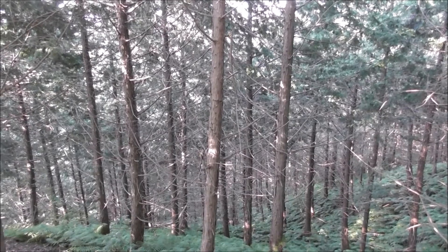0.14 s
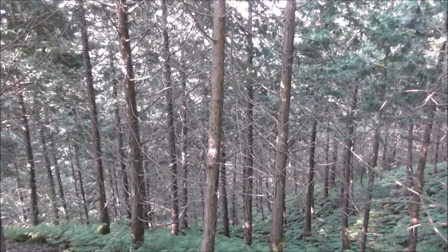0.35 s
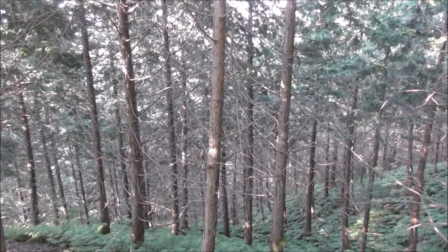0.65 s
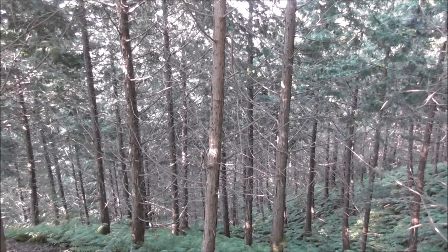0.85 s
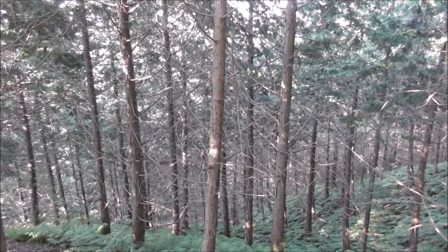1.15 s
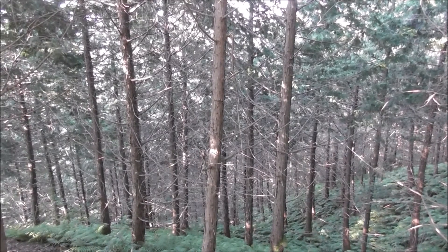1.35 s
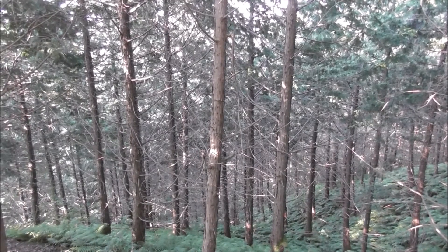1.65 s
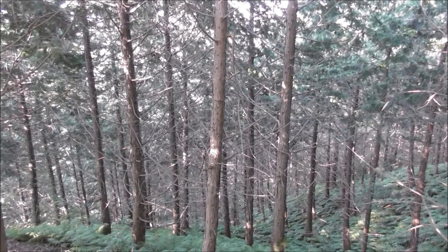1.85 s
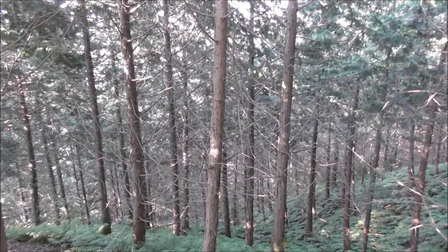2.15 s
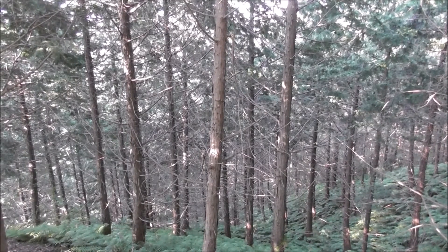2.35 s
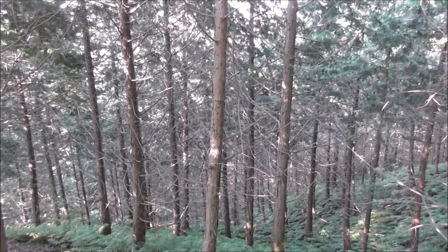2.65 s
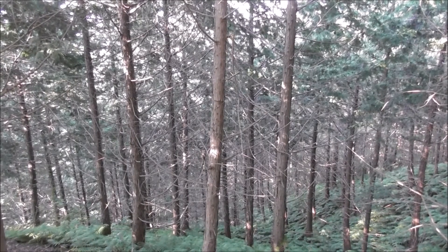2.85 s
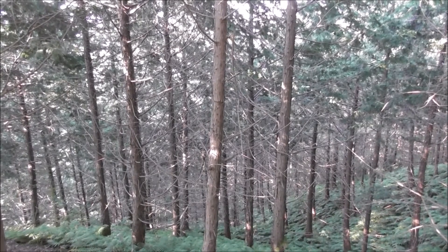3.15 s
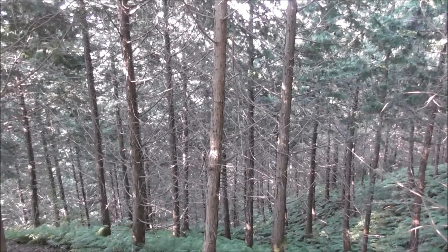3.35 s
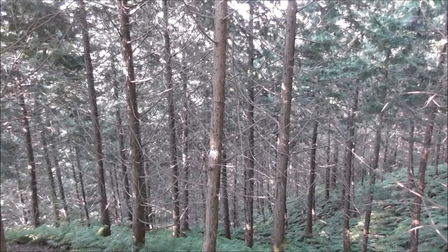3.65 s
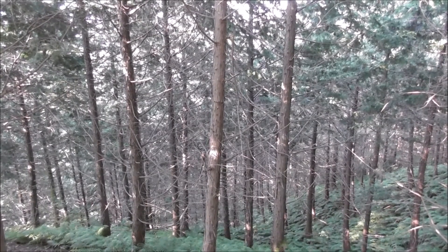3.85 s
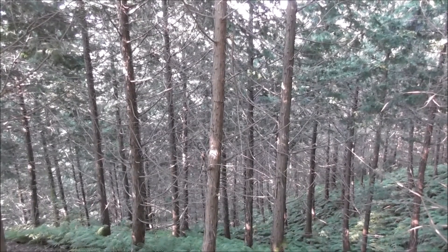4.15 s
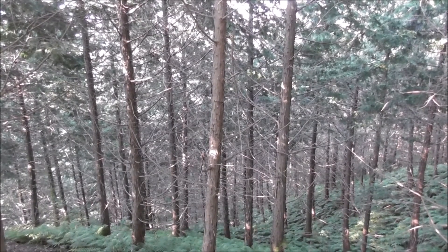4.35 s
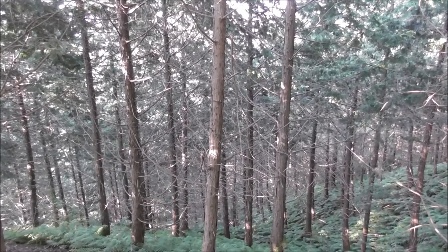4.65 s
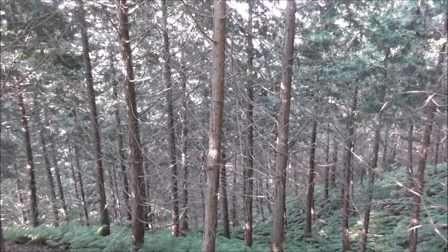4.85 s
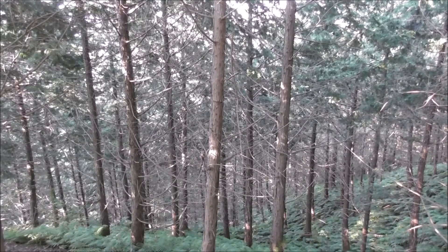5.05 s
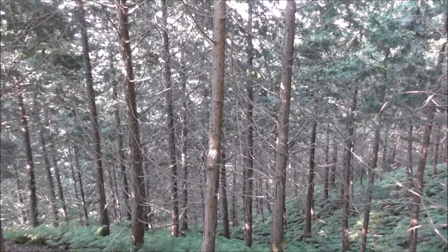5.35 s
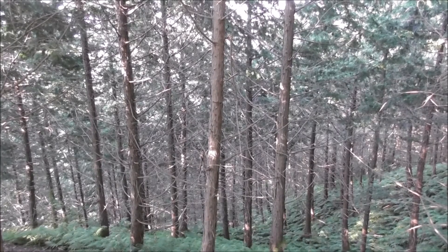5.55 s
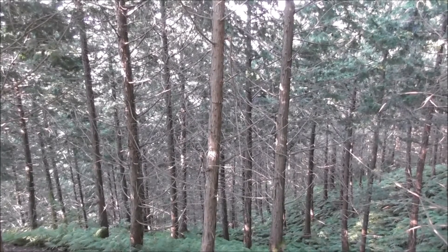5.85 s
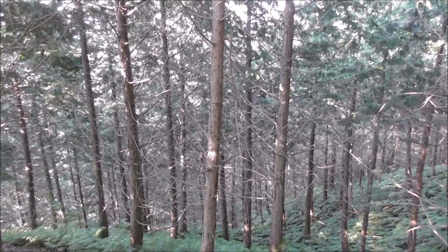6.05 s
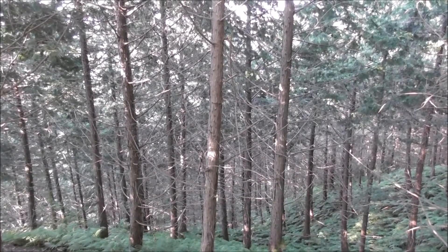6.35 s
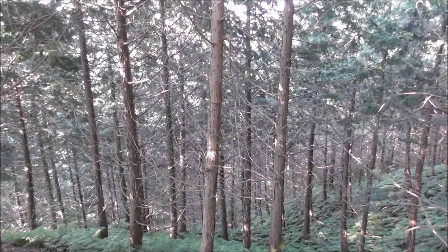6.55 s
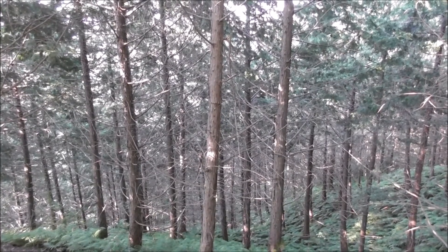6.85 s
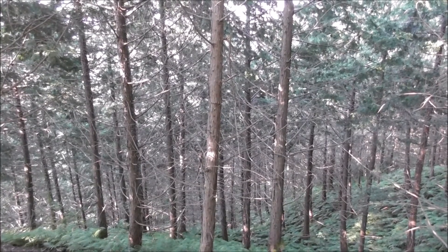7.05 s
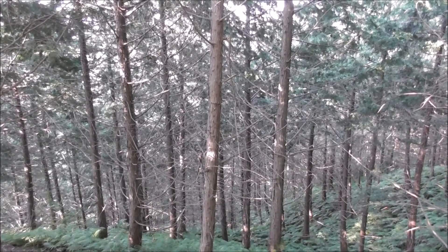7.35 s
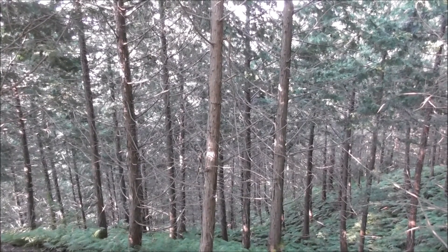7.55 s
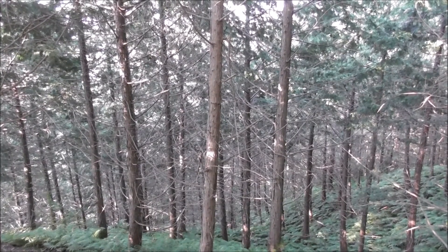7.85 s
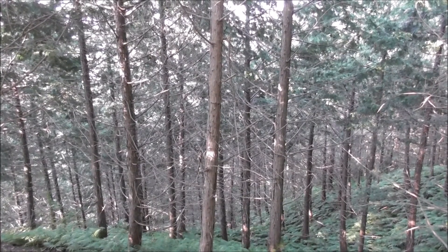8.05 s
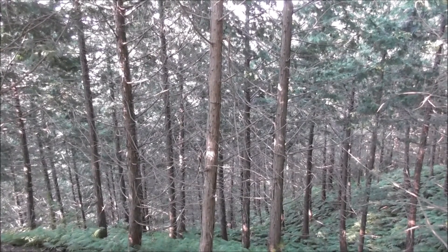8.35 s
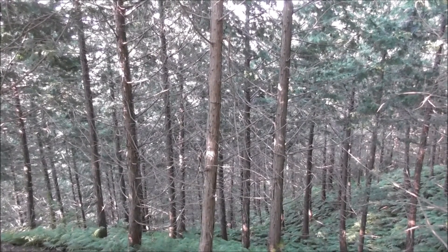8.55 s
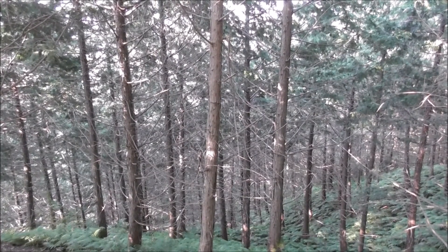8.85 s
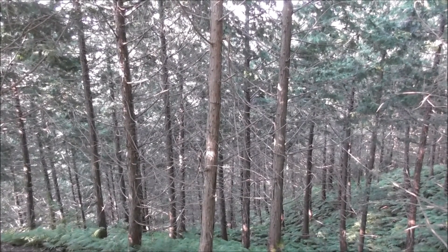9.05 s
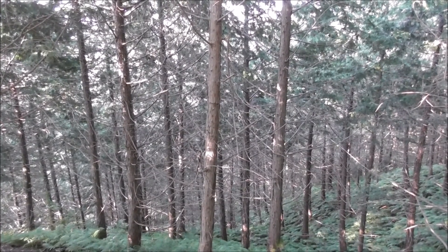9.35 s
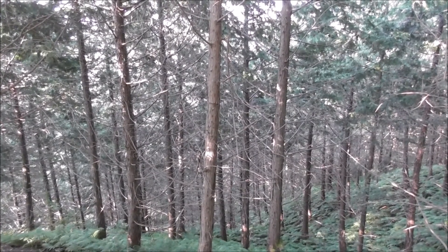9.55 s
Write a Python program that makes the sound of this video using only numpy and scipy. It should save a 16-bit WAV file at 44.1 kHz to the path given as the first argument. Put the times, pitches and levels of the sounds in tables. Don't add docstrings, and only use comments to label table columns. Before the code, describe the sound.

A wide stereo pickup in a conifer forest on a summer evening. From the start, a diffuse far chorus of cicadas shimmers around 4 kHz with a diffuse woodland echo, under a steady, sizzling canopy hiss near 8 kHz, over faint low traffic. Around 1 s two weaker near singers begin; at 2 s two loud ones overlap, trilling about twelve pulses a second, rising in pitch and swelling, then slowing and sagging until nearly 4 s. A quieter lull follows with one faint call. From 5.3 s others start, one very strong through about 6.8 s; softer trills follow from 6.8 to 8.5 s as the far chorus and hiss swell. At 8.5 s several singers join together until the end at 9.7 s. Traffic swells gently near 1.5 and 7.8 s, a faint engine hum climbs slowly, and soft low handling knocks come at 4, 8.2 and 8.6 s.

```python
import sys
import numpy as np
from scipy import signal
from scipy.fft import rfft, irfft
from scipy.io import wavfile
from scipy.ndimage import uniform_filter1d, minimum_filter1d, map_coordinates

SR = 44100
rng = np.random.default_rng(int(sys.argv[2]) if len(sys.argv) > 2 else 0)


def nominal_scale(level):
    x = np.asarray(level, float) / 20
    return 10 ** x


def master_out(mix):
    frames = np.transpose(np.atleast_2d(mix))
    ceiling = np.clip(frames, -1, 1)
    pcm = np.round(ceiling * 32767).astype(np.int16)
    wavfile.write(sys.argv[1], SR, pcm)


N = 427329


def unit(x):
    return x / np.sqrt(np.mean(x ** 2) + 1e-20)


def along(points, hz):
    f, v = np.transpose(points)
    return np.interp(np.log(hz + 1), np.log(f + 1), v)


def curves(rows):
    s, *cols = np.transpose(rows)
    return [np.interp(np.arange(N) / SR, s, c) for c in cols]


def swells(rows):
    t = np.arange(N) / SR
    return sum(db * np.exp(-((t - s) / half) ** 2) for s, half, db in rows)


def wobble(rate):
    knots = rng.standard_normal(int(N * rate / SR) + 4)
    return map_coordinates(knots, [np.arange(N) * rate / SR])


def rush(colour_db, patchy_db):
    # (frequency [Hz], correlation [-1 to 1])
    alike = [(25, -0.93), (60, -0.83), (95, -0.35), (130, -0.11), (550, -0.25), (1150, -0.17), (2400, 1),
             (5000, 1), (8000, 0.88), (11000, -0.54), (12500, -0.3)]
    z = signal.stft(rng.standard_normal((2, N)), nperseg=512)[2]
    field = uniform_filter1d(rng.standard_normal(z.shape[1:]), size=5, axis=0)
    field = uniform_filter1d(field, size=10, axis=1)
    pair = signal.istft(z * nominal_scale(patchy_db * unit(field)), nperseg=512)[1][:, :N]
    hz = np.fft.rfftfreq(N + 191, 1 / SR)
    turn = np.arccos(np.clip(along(alike, hz), -1, 1)) / 2
    shares = [np.cos(turn), np.sin(turn)]
    mid, side = irfft(rfft(pair, N + 191) * nominal_scale(colour_db(hz)) * shares)[:, :N]
    return unit(np.array([mid + side, mid - side]))


def syllables(s, hz, db, tones_db, sides_db, click_hz, rough, span=1):
    t = np.arange(-1200, 800) / SR
    width, power = np.where(t < 0, .019, .0135), np.where(t < 0, 2.4, 3.5)
    swell = np.exp(-np.abs(t / span / width) ** power)
    phase = 2 * np.pi * rng.random((len(s), 12))
    walks = np.cumsum(rng.standard_normal((2, len(s), len(t))), axis=2)
    drift, jitter = uniform_filter1d(walks, size=60, axis=2)
    turn = np.pi * hz[:, None] * t + rough * drift
    clicks = np.exp(1j * (2 * np.pi * click_hz * t + .045 * jitter))
    throb = 1
    for step, level in zip((-1, 1, 2), sides_db):
        throb = throb + nominal_scale(level) * clicks ** step * np.exp(1j * phase[:, [step]])
    stack = 0
    for k, level in enumerate(tones_db):
        stack = stack + nominal_scale(level) * np.exp(1j * ((k + 1) * turn + phase[:, [k + 3]]))
    burst = nominal_scale(db)[:, None] * swell * (throb * stack).real
    at = np.round(s * SR).astype(int)[:, None] + np.arange(len(t))
    return np.bincount(at.ravel(), burst.ravel(), N + 2 * len(t))[1200:N + 1200]


def forest(x, t60, apart):
    t = np.arange(SR // 2) / SR
    envelope = nominal_scale(-60 * t / t60) * (1 - np.exp(-t / 0.09))
    shared, own = rng.standard_normal((2, len(t))) * envelope
    tails = np.array([shared + apart * own, shared - apart * own]) / np.linalg.norm(shared)
    return signal.fftconvolve(x[None], tails, axes=1)[:, :N]


def far_chorus(count=1500):
    # (time [s], level [dB])
    chorus_level = [(0.0, -18.5), (0.57, -23.5), (1.91, -27.5), (2.29, -18.5), (2.51, -16), (2.86, -15.5),
                    (3.7, -20), (4.4, -22.5), (5.29, -28.5), (5.88, -25), (6.56, -23), (6.9, -18.5),
                    (7.3, -17), (8.72, -17), (8.88, -20.5), (9.2, -19), (9.69, -19)]
    level_db, = curves(chorus_level)
    half_db = -6.5 - 0.28 * (level_db - level_db.mean())
    luck = rng.standard_normal((count, 2))
    s = (np.arange(count) + rng.random(count)) / count * (N - 1) / SR
    at = (s * SR).astype(int)
    hz = 4205 + 260 * np.tanh(0.704 * luck[:, 0])
    tones_db = [half_db[at, None], 0, -19]
    dry = syllables(s, hz, 0.85 * luck[:, 1], tones_db, [-15, -16, -20], click_hz=298.6, rough=0.051)
    group = np.arange(N) // 9000 % 6
    wet = sum(forest(dry * (group == k), t60=.6, apart=.33) for k in range(6))
    return nominal_scale(level_db - 0.5) * nominal_scale([[.6], [-.6]]) * unit(0.91 * dry + wet)


def canopy():
    # (time [s], level [dB], brightness [dB])
    hiss_level = [(0.0, -19.5, 3), (0.8, -21.5, 7.5), (2.4, -14, -4), (2.9, -18.5, -1), (3.94, -19, -1),
                  (5.16, -18, -0.5), (5.99, -18, 2), (6.56, -17.5, -4), (7.85, -13, -8), (8.6, -15.5, -1.5),
                  (9.69, -25.5, 9)]
    # (frequency [Hz], density [dB per Hz])
    hiss_colour = [(2880, -60), (4900, -19.5), (5430, -10.5), (5970, -5.5), (6750, -4.5), (7500, -0.5),
                   (8000, 3), (8310, 1), (8510, 1), (9050, -4), (9230, -8.5), (9590, -12.5), (9880, -12.5),
                   (10700, -22), (11100, -28), (14400, -73), (22000, -120)]
    # (frequency [Hz], level [dB])
    air_colour = [(10300, -34), (11000, -4), (12500, -14), (16000, 1)]
    # (frequency [Hz], level [dB])
    whine = [(8297, -43), (8700, -40), (8819, -39.5), (9135, -50), (9223, -45), (9455, -48), (9625, -52),
             (9755, -54)]
    # (time [s], level [dB])
    whine_level = [(0, 19), (2, 17), (3, -26), (5.3, 10), (6.5, 9), (9.69, -12)]

    level_db, bright_db = curves(hiss_level)
    dull_colour = [(4000, -32.5)] + hiss_colour
    bright_colour = [(4000, -37)] + hiss_colour
    tilt = [(6500, -22.0), (8500, -15.5)]
    dull = rush(lambda hz: along(dull_colour, hz), patchy_db=1.0)
    bright = rush(lambda hz: along(bright_colour, hz) + along(tilt, hz), patchy_db=0.6)
    t = np.arange(N) / SR
    lines = sum(nominal_scale(db - 5.5) * wobble(22) * np.sin(2 * np.pi * hz * t) for hz, db in whine)
    hiss = nominal_scale(level_db - 3.5 + 0.073 * wobble(17.0)) * (dull + nominal_scale(bright_db) * bright)
    hiss = hiss + nominal_scale(level_db - 27.5) * rush(lambda hz: along(air_colour, hz), patchy_db=1)
    buzzer = nominal_scale(curves(whine_level)[0]) * lines
    return nominal_scale([[-.4], [.4]]) * hiss + nominal_scale([[-1.5], [1.5]]) * buzzer


def valley():
    # (frequency [Hz], density [dB per Hz])
    traffic = [(12, -35), (20, 8.5), (91, -0.5), (120, -6.5), (163, -3.5), (285, -7.5), (545, -9),
               (728, -14.5), (1370, -20), (1500, -18.5), (1950, -14), (3300, -120)]
    # (nearest time [s], half length [s], swell [dB])
    passes = [
        (1.5, 1.36, 8.5),
        (4.7, 0.7, 4),
        (5.8, 0.43, 3.5),
        (7.8, 1.8, 5.5),
    ]
    # (time [s], half length [s], swell [dB])
    engine_heard = [
        (2.2, .7, 5),
        (5.1, 1.36, 16),
        (8.6, 2, 19),
    ]

    engine_hz = 118.5 + 5.75 * np.arange(N) / SR
    engine_db = -64.5 + swells(engine_heard)
    turn = 2 * np.pi * np.cumsum(engine_hz + 0.81 * wobble(5)) / SR
    note = nominal_scale(engine_db + 2.0 + 0.57 * wobble(3.03)) * np.sin(turn)
    rumble_colour = traffic + [(2500, -60)]
    rumble = nominal_scale(-45.5 + swells(passes) + 4.0) * rush(lambda f: along(rumble_colour, f), patchy_db=1.5)
    haze_colour = [(1100, -70), (1700, 9.5), (3200, 9.0), (3500, 13), (4800, -5.0), (5500, -34)]
    haze = nominal_scale(-51 + 5) * rush(lambda f: along(haze_colour, f), patchy_db=2.5)
    return rumble + haze + note * nominal_scale([[1.2], [-1.2]])


def song(tempo, pitch, effort):
    first, count, gap, drag = tempo
    k, luck = np.arange(count), rng.standard_normal((count, 2))
    tired = k / (count - 1)
    t = gap * k + drag * tired ** 4

    def arch(full, below, rise, end, power):
        return full - below * np.exp(-(t / rise) ** 2) - end * tired ** power

    hz = arch(*pitch, power=2.5) + 7.2 * luck[:, 0]
    db = arch(*effort, power=3) + 0.4 * luck[:, 1]
    return first + t, hz, db


def near_singers():
    # (first syllable [s], syllables [count], gap [s], delay gathered by the tired end [s])
    tempos = [(.913, 16, .0795, .04), (1.062, 11, .08, .02), (2.05, 21, .076, .14),
              (2.146, 20, .0767, .112), (5.41, 16, .083, 0), (5.47, 16, .081, .05), (5.643, 13, .0835, .01),
              (6.761, 21, .08, .05), (7.11, 17, .079, .09), (8.525, 15, .0745, .09), (8.501, 15, .0805, 0),
              (3.89, 10, .086, 0), (5.256, 6, .081, 0), (8.5, 15, .076, .05)]
    # (full main tone [Hz], start below it [Hz], climb [s], sag by the end [Hz])
    pitches = [(4526, 146, 0.22, 38), (4230, 160, .15, 32), (4324, 280, 0.277, 130), (4126, 330, 0.406, 78),
               (4618, 35, 0.081, 56), (4510, 296, 0.287, 62), (4174, 167, .2, 56), (4316, 82, 0.38, 66),
               (4064, 110, 0.12, 110), (4200, 250, 0.316, 80), (4355, 214, 0.297, 15), (4040, 5, .1, 110),
               (4500, 48, 0.2, 5), (4320, 220, 0.205, 20)]
    # (full level [dB], start below it [dB], swell [s], fade by the end [dB])
    efforts = [(-21.5, 3.5, .25, 4.5), (-20.5, -1.5, 0.093, 1.5), (-9.5, 6.5, 0.18, 11), (-8, 16, 0.16, 3),
               (-17, 3.5, 0.18, 7), (-6, 22, 0.23, 7.5), (-20.5, 5, 0.091, 5), (-21, -3.5, .2, -1),
               (-20.5, 0, .1, -3), (-13.5, -7, .35, -4.5), (-14, 4.5, 0.23, -3), (-26, 42, 0.046, 6),
               (-21, -1, .1, 5), (-20.5, 5, 0.29, -1)]
    # (left-right difference [dB], click rate [Hz], rasp relative to the main tone [dB])
    perches = [(5.5, 570, -34), (3, 350, -33), (0, 328, -5.5), (0, 284, -6.5), (1.5, 326, -31),
               (4.5, 316, -8), (2, 316, -18), (2, 256, -7), (5, 272, -21), (-0.5, 286, -6), (0, 281, -9),
               (2, 280, -24), (2, 290, -26), (-3, 296, 0.5)]
    # (lower [dB], upper [dB], second upper [dB])
    sidebands = [(-38, -60, -36), (-18, -31, -18), (-20, -10, -17.5), (-18.5, -10, -23), (-5, -28, -16),
                 (-13.5, -13, -12), (-14, 3.5, -28), (-9, -11, -32), (-15.5, -3.5, -19), (-20, -12, -21),
                 (-11, -14, -17), (-10, -5, -20), (-11, -20, -27), (-18, -12, -30)]
    # (half tone [dB], 3/2 tone [dB], double tone [dB], 5/2 tone [dB])
    overtones = [(-11.5, -2, -24, -42), (-56, -10, -7, -40), (-14, -11, -6.5, -34), (-14, -12.5, -9, -22),
                 (-13.5, -10, -10, -38), (-14.5, -12.5, -28, -31.5), (-15, -10, -25, -21),
                 (-8, -5.5, 0, -19), (-7.5, -8, -12, -25), (-11, -6.5, -21, -25), (-10.5, -16, -24, -30),
                 (-5, -6, -9, -28), (-12, -18, -20, -36), (-5, 1, 4, -11)]
    # (frequency [Hz], level [dB])
    rasp_colour = [(5000, -16), (6200, 0), (7400, -33), (8400, 13), (9100, -17), (9600, -22), (10500, -3),
                   (11300, -20), (12500, -22), (16000, -50)]

    out, rasp = np.zeros((2, N)), np.zeros(N)
    singers = zip(tempos, pitches, efforts, perches, sidebands, overtones)
    for tempo, pitch, effort, perch, sides, (half, third, double, fifth) in singers:
        pan_db, click_hz, rasp_db = perch
        s, hz, db = song(tempo, pitch, effort)
        slack = (np.minimum(hz.max() - hz, 220) * (s < s[hz.argmax()]))[:, None]
        upper_db = (third, double, fifth, fifth - 22, fifth - 30)
        tones_db = [half, 0] + [level - 0.035 * slack for level in upper_db]
        sides_db = [level + rate * slack for level, rate in zip(sides, (0.032, 0.0083, 0.0081))]
        rough, span = .011 + .0001 * slack, 1 - 0.002 * slack
        dry = syllables(s, hz, db, tones_db, sides_db, click_hz, rough, span)
        echoes = forest(dry, t60=.6, apart=.25)
        out += nominal_scale([[pan_db / 2], [-pan_db / 2]]) * dry + nominal_scale(-12) * echoes
        rasp += nominal_scale(rasp_db) * uniform_filter1d(np.abs(dry), size=200)
    return out + rasp * rush(lambda f: along(rasp_colour, f), patchy_db=-7.0)


def thumps():
    # (time [s], level [dB], frequency [Hz])
    knocks = [
        (8.17, -27, 98),
        (8.58, -28, 59),
        (1.6, -44, 68),
        (1.9, -44, 40),
        (4.02, -37, 58),
    ]
    out, t = np.zeros(N), np.arange(SR // 4) / SR
    for s, db, hz in knocks:
        envelope = nominal_scale(db - 60 * t / 0.56) * (1 - np.exp(-t / 0.037)) ** 2
        out[round(s * SR):][:len(t)] += envelope * np.sin(2 * np.pi * hz * t)
    return out * np.array([[1.6], [-.4]])


def scene():
    # (frequency [Hz], gain [dB])
    body = [(1400, -45), (1750, -0.5), (1950, -2.5), (2200, 2), (2450, -4), (3300, 0.5), (3480, -5),
            (3620, -2), (4000, -1), (11000, -3.5), (16000, -6)]
    trills = rfft(far_chorus() + near_singers(), N + 191)
    body_gain = nominal_scale(along(body, np.fft.rfftfreq(N + 191, 1 / SR)))
    trills = irfft(trills * body_gain)[:, :N]
    return trills + canopy() + valley() + thumps()


def band_limit(x):
    return signal.sosfilt(signal.butter(12, 15800, fs=SR, output="sos"), x)


def record(dry):
    need = np.minimum(1, .97 / (np.abs(dry).max(0) + 1e-9))
    gain = uniform_filter1d(minimum_filter1d(need, size=301), size=301)
    return band_limit(dry * gain)


dry = scene()
out = record(dry)
master_out(out)
```